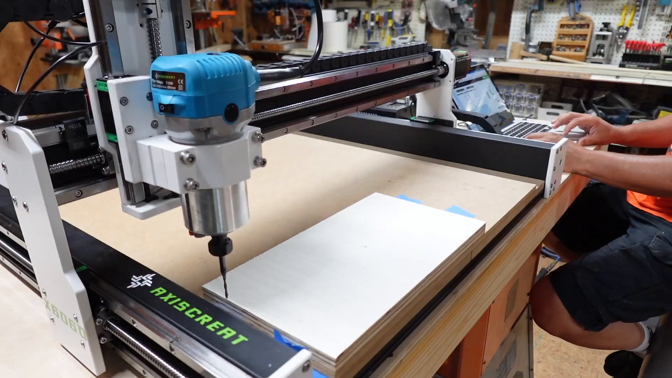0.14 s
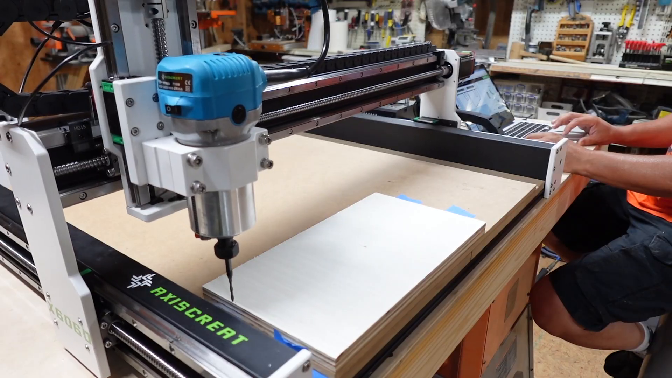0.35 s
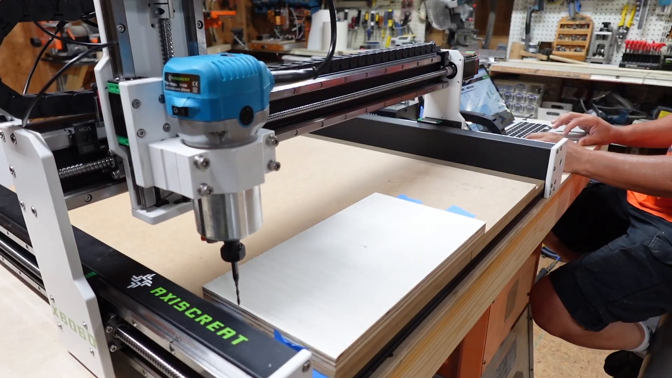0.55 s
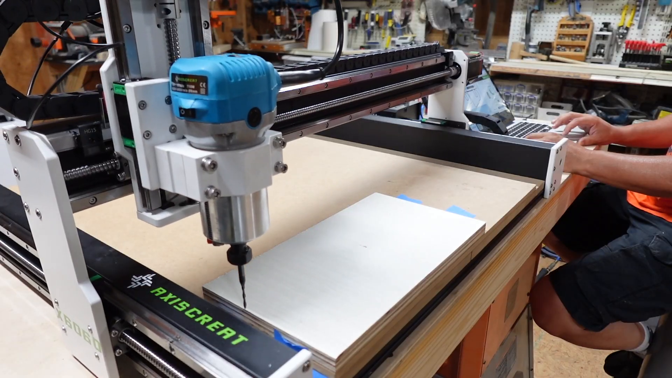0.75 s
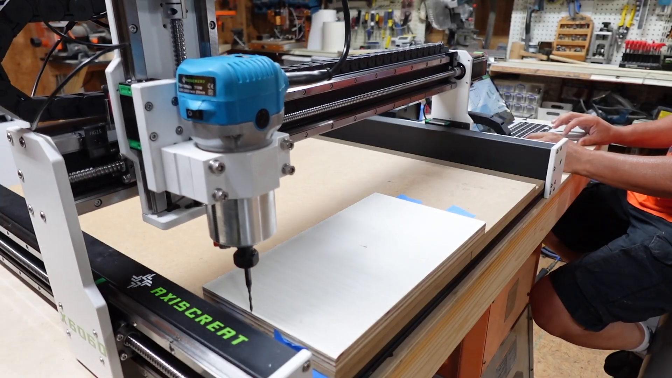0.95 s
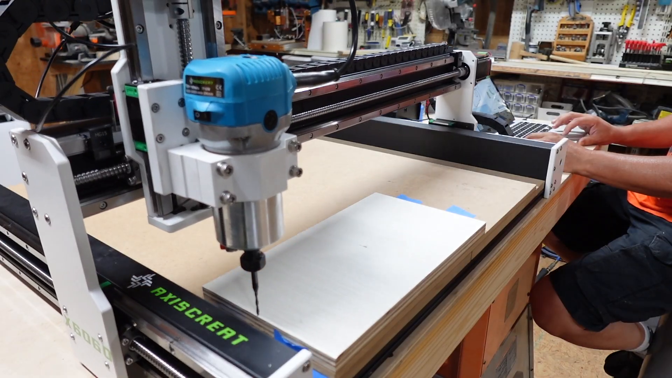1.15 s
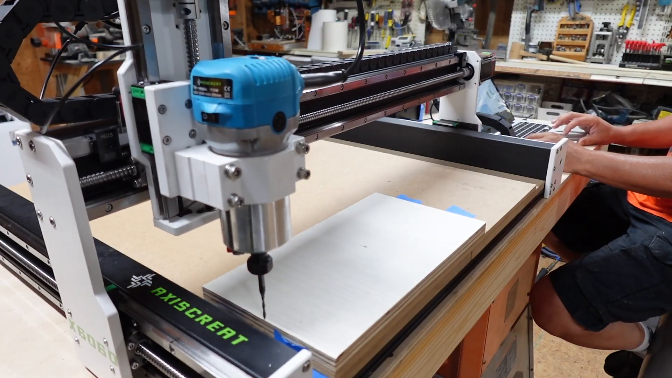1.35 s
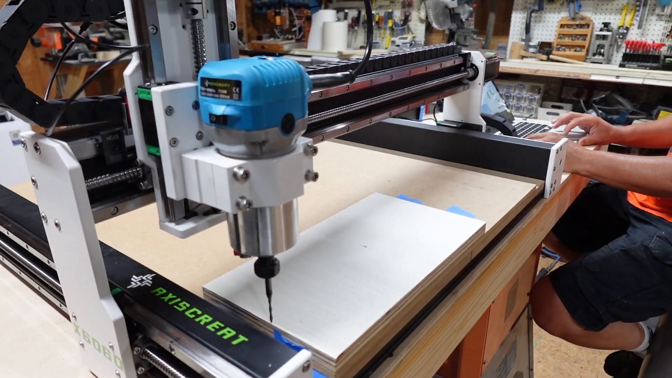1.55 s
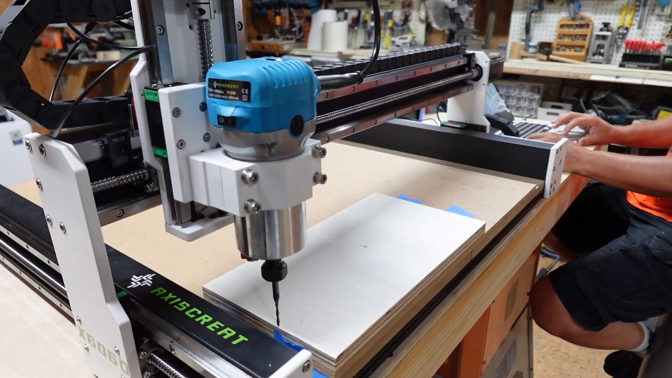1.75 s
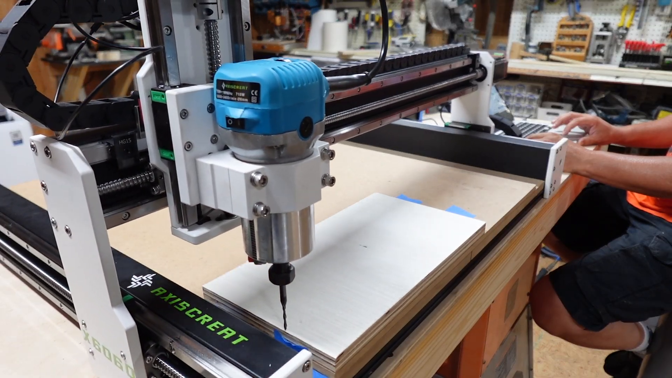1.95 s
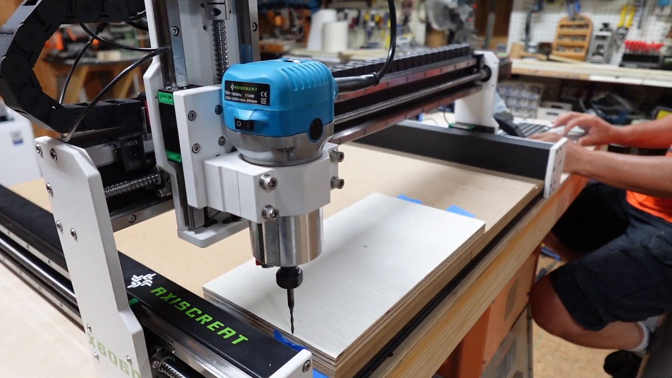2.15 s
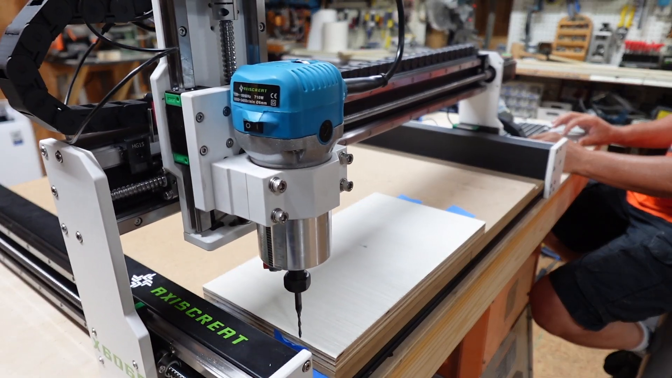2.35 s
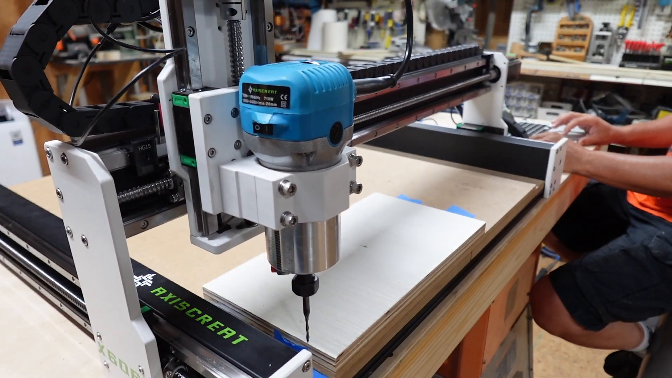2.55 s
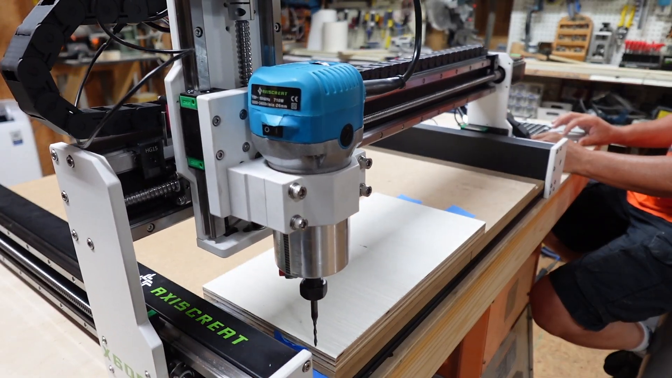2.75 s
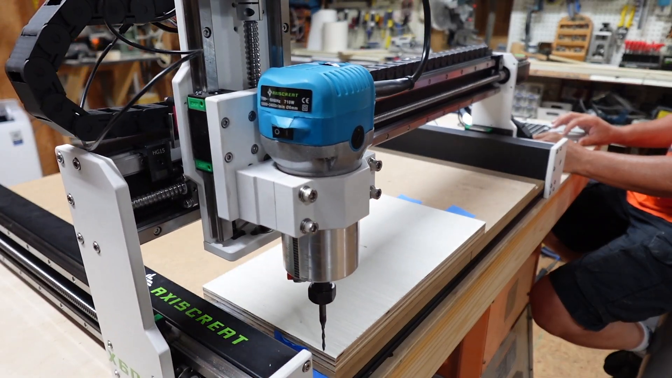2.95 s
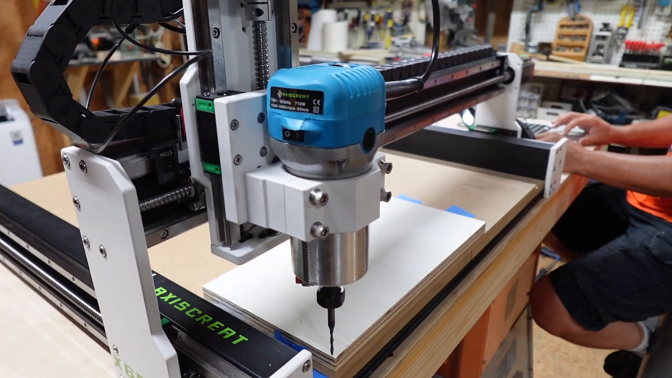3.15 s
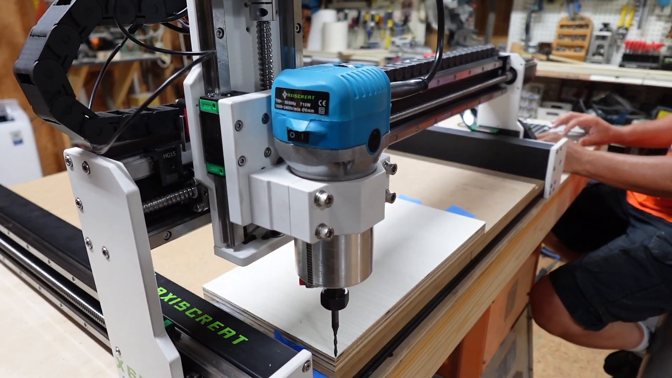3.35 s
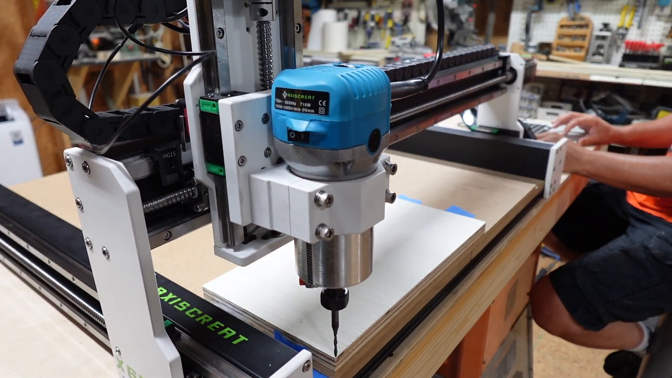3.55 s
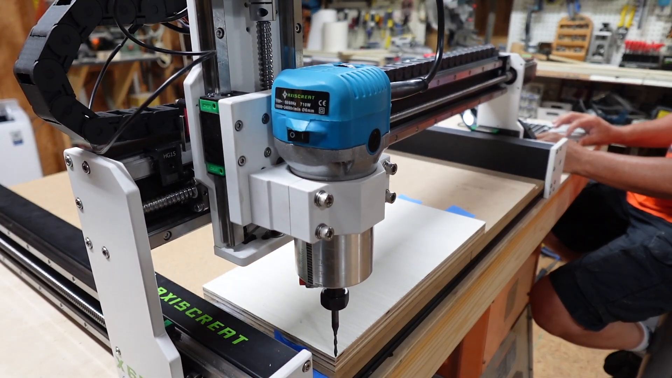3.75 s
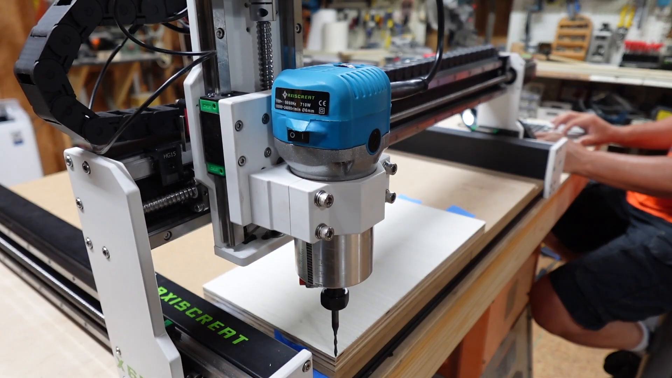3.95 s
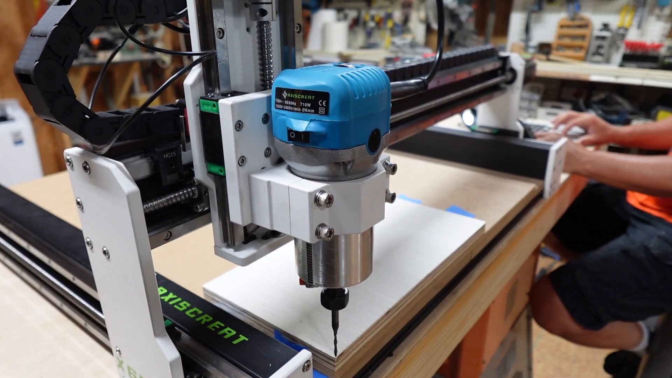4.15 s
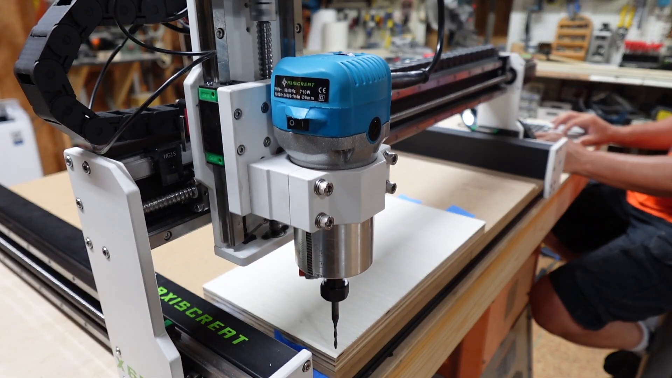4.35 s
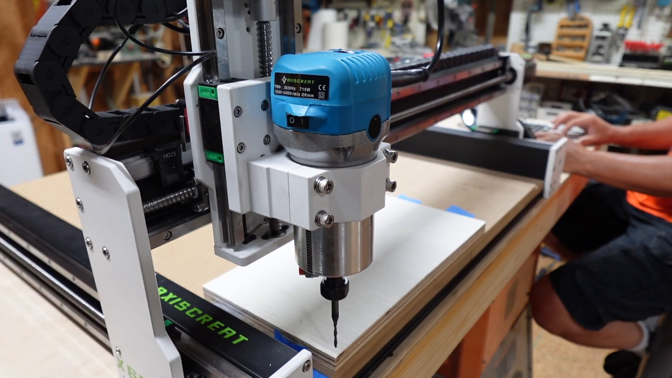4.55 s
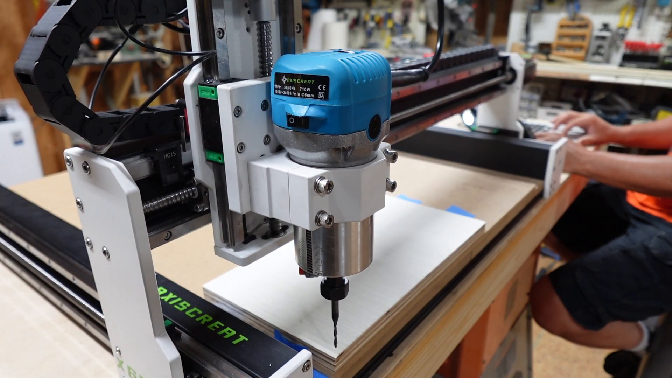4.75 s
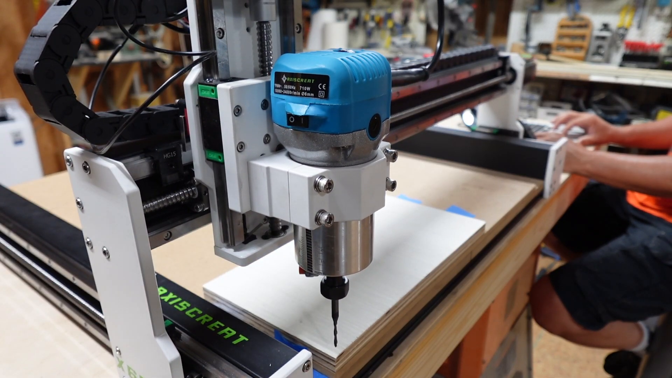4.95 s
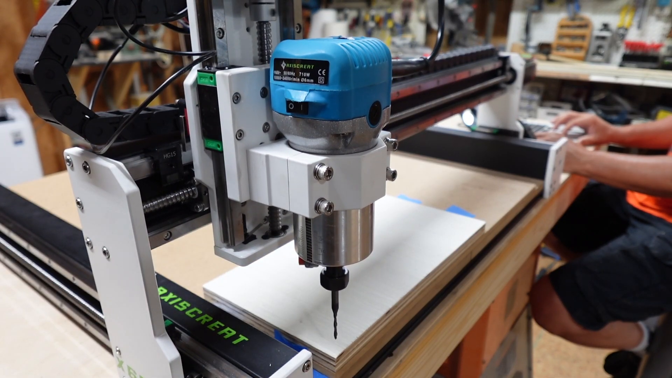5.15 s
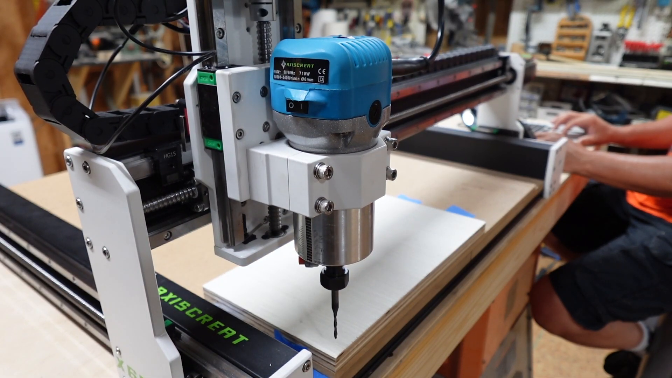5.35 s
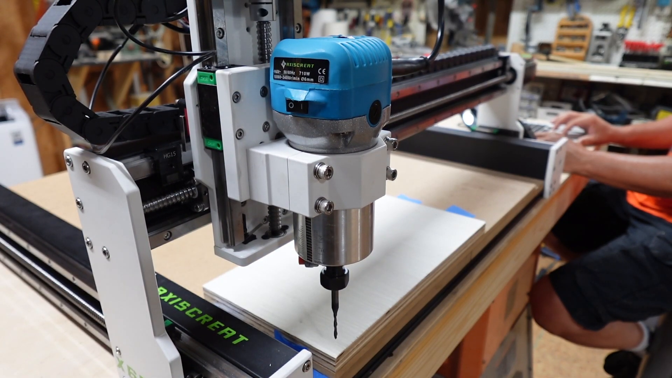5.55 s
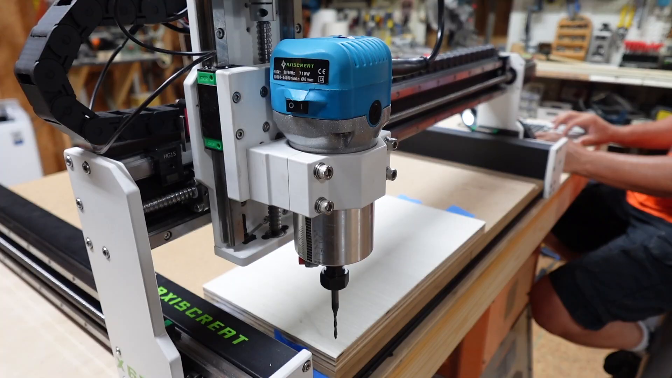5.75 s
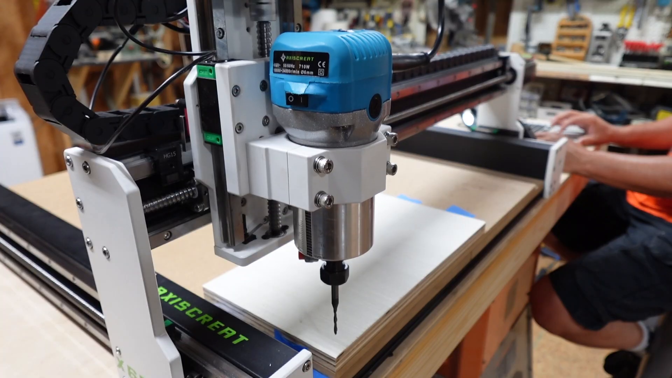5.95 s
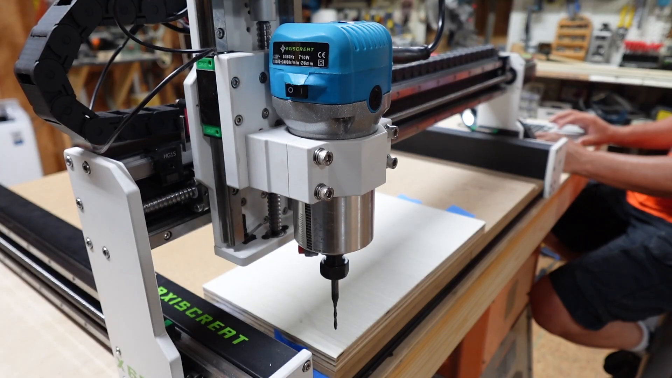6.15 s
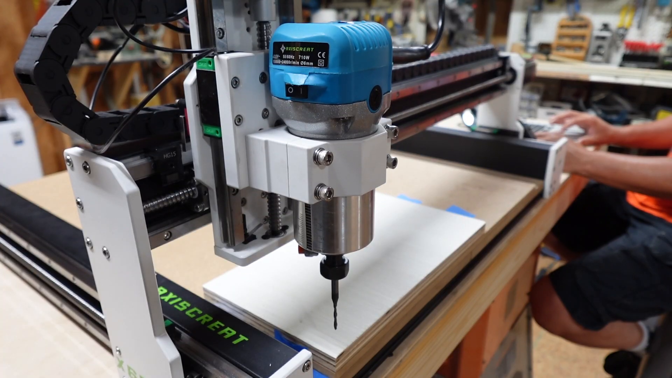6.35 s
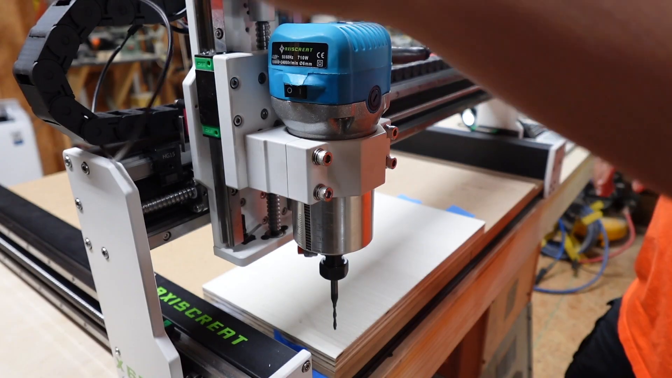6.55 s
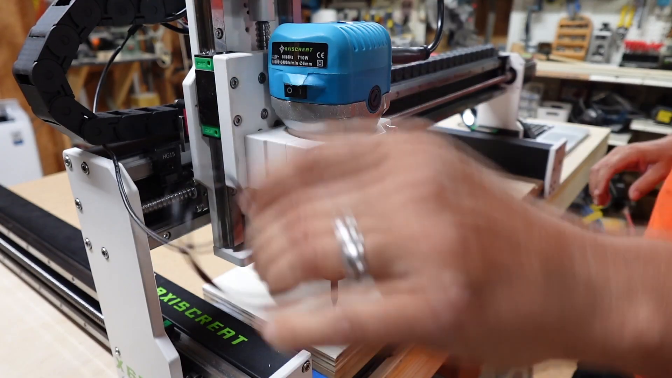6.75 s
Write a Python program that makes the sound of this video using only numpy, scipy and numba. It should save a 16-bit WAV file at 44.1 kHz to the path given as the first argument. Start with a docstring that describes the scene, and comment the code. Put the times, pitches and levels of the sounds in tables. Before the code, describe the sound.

A stepper motor drones and whines with rolling hiss for three seconds, brakes abruptly, then three faint clicks each precede a tiny motor blip.

```python
"""A stepper motor drives the carriage of a desktop CNC router along its gantry in a workshop, then brakes.
Its hum and whine are sines locked to the shaft angle; filtered noise makes the nut roll along a ringing screw.
Three small clicks at a laptop, filtered impulses, each precede a short, quiet move of the vertical axis.
A faint resonant noise floor rises and drops in spells over steady background noise; noise tails make the room."""
import sys
import numpy as np
from scipy import signal
from scipy.fft import rfft, irfft
from scipy.io import wavfile
from scipy.ndimage import uniform_filter1d, map_coordinates
from numba import njit

SR = 44100
rng = np.random.default_rng(int(sys.argv[2]) if len(sys.argv) > 2 else 0)


def wav_record(signal):
    """Record a signal, one row per channel, as 16-bit PCM in the file named by sys.argv[1]."""
    frames = np.transpose(np.atleast_2d(signal))
    bounded = np.clip(frames, -1, 1)
    # unit amplitude maps onto the largest positive 16-bit level
    quanta = np.round(bounded * 32767).astype(np.int16)
    wavfile.write(sys.argv[1], SR, quanta)


N = 304290
T = np.arange(N) / SR  # seconds
SHAFT_HZ, RAMP_S = 12.168, .094  # turns per second at full speed; time from rest to full speed

# The long move of the carriage, under way from the outset.
# Each row: full speed reached in seconds, braking starts in seconds, relative level in dB.
GANTRY_MOVE = [(-1, 3.299, 0.5)]


def undb(db):
    """Logarithmic level: decibels become an amplitude ratio."""
    return 10 ** (np.asarray(db) / 20)


def unit(x):
    """Normalisation by power: scale to rms 1."""
    return x / np.sqrt(np.mean(x ** 2))


def walk(rate):
    """Band-limited chance: random values, rate per second, smoothed twice, with a spread near 1."""
    k = int(SR / rate)
    values = np.repeat(rng.standard_normal(N // k + 1), k)
    return 1.7 * uniform_filter1d(uniform_filter1d(values, k), k)[:N]


def curve(points):
    """Linear interpolation: timed points joined by straight lines."""
    return np.interp(T, *np.transpose(points))


def ease(at_s, over_s):
    """Sigmoid transition: a smooth change from 0 to 1, halfway at at_s."""
    return .5 + .5 * np.tanh((T - at_s) / over_s)


def colour(x, points):
    """Minimum-phase filtering: a causal filter whose spectrum follows (Hz, dB) points."""
    hz, db = np.transpose(points)
    size = 4096
    log_hz = np.log(np.fft.rfftfreq(size, 1 / SR) + 1)
    gain = undb(np.interp(log_hz, np.log(hz), db))
    # folding the cepstrum onto positive times makes the response causal
    cepstrum = irfft(np.log(gain))
    cepstrum[1:size // 2] *= 2
    cepstrum[size // 2 + 1:] = 0
    response = irfft(np.exp(rfft(cepstrum)))
    return signal.fftconvolve(x, response)[:len(x)]


@njit
def svf(x, hz, width):
    """Second-order resonance: a state-variable band-pass with a moving centre, gain 1 there."""
    y, band, low = np.empty(len(x)), 0., 0.
    for i in range(len(x)):
        g, k = np.pi * hz[i] / SR, width / hz[i]
        v = (band + g * (x[i] - low)) / (1 + g * (g + k))
        band, low, y[i] = 2 * v - band, low + 2 * g * v, k * v
    return y


def ring(x, modes):
    """Modal superposition: one drive excites fixed resonances (Hz, width in Hz, dB) in parallel."""
    return sum(undb(db) * svf(x, np.full(N, float(hz)), float(width)) for hz, width, db in modes)


def motion(moves, jitter, swell_db=0):
    """Kinematics: speed 0-1 on straight ramps, a gain swelling in each move, and the integrated shaft angle."""
    speed, gain = 0, 1
    for start, stop, db in moves:
        ramp = np.clip(1 + np.minimum(T - start, stop - T) / RAMP_S, 0, 1)
        progress = np.clip((T - start) / (stop - start), 0, 1)
        speed = speed + ramp
        gain = gain * undb((db + swell_db * (progress - 1.0)) * (ramp > 0))
    steps_per_turn = 200
    # jitter is in radians of the step tone's phase
    shake = jitter * walk(170) / steps_per_turn
    return speed, gain, 2 * np.pi * SHAFT_HZ * np.cumsum(speed) / SR + shake


def tones(angle, orders, waver_db):
    """Order excitation: sines locked to multiples of the shaft angle, each wavering as the load shifts."""
    out = 0
    for multiple, db in orders:
        level = undb(db + waver_db * walk(4.2))
        out = out + level * np.sqrt(2) * np.sin(multiple * angle + rng.uniform(0, 2 * np.pi))
    return out


def rolling(grain_db):
    """Contact noise: white noise with random grain, as from dense, uneven contacts of balls in nut and rails."""
    return unit(rng.standard_normal(N) * undb(grain_db * walk(450)))


def soften(x, speed, corner_hz=2600):
    """Contact stiffness: slow contacts are softer, so the treble follows the speed."""
    dull = signal.sosfilt(signal.butter(1, corner_hz, fs=SR, output="sos"), x)
    return dull + speed * (x - dull)


def settle(drive, settle_s):
    """Exponential relaxation: loose parts go on rattling briefly after their drive has eased."""
    keep = np.exp(-1 / (settle_s * SR))
    return np.maximum(drive, signal.lfilter([1 - keep], [1, -keep], drive))


def chatter(angle, chop_hz=95, depth=0.46):
    """Amplitude modulation: the whine is chopped rapidly, near 95 times a second, in a wandering rhythm."""
    chop_phase = 2 * np.pi * chop_hz * T + 1.2 * walk(60)
    return np.sqrt(2) * np.sin(200 * angle) * (1 + depth * np.cos(chop_phase))


def driver(moving, db):
    """Current chopping: the motor supply whistles thinly near 13.4 kHz while an axis moves."""
    return undb(db) * np.sqrt(2) * moving * np.sin(2 * np.pi * 13400 * T + .9 * walk(40))


def gantry():
    """Forced vibration by a moving axis: the tones of the long move, and its rattle."""
    speed, gain, angle = motion(GANTRY_MOVE, jitter=0.16)
    whistle = driver(np.minimum(10 * speed, 1), db=-71)
    return gain * gantry_motor(speed, angle) + whistle, gain * gantry_rattle(speed)


def gantry_motor(speed, angle, swing=0.4, tight_spot=1.4, hum_db=2.12, whine_db=1.23, braking_db=-17):
    """Synchronous excitation: coil hum and step whine; under braking the whine sweeps through frame modes."""
    # Coil hum along the gantry. Each row: time in seconds, level in dB before hum_db is added.
    hum_levels = [(0.04, -28), (0.26, -29.5), (0.55, -35), (0.67, -31), (1.15, -26), (1.18, -30),
                  (2.28, -32), (2.87, -28.5), (3.26, -29)]
    # Step whine, swelling late in the travel. Each row: time in seconds, level in dB before whine_db is added.
    whine_levels = [(0.1, -35), (1.62, -29), (2.13, -35), (2.47, -26), (3.07, -20.5), (3.28, -20.5)]
    # Weaker motor tones. Each row: multiple of the shaft speed, relative level in dB.
    orders = [(71, -50), (95, -52.5), (100, -38), (101, -52), (103, -47), (150, -45), (151, -42),
              (194, -47.5), (250, -65), (300, -74.5), (400, -66), (550, -77), (600, -72)]
    # Frame modes. Each row: frequency in Hz, width in Hz, relative gain in dB.
    frame_modes = [(883, 38, 0.5), (960, 52.8, -6.5), (1400, 120, -5.5), (1850, 330, -3), (2350, 64, 3),
                   (478, 62, -17), (236, 26, -12)]
    # fifty rotor teeth, four full steps to each; the rotor labours at a tight spot (radians) in each turn
    turn = angle - tight_spot
    coil = np.sqrt(2) * np.sin(50 * angle)
    step = np.sqrt(2) * np.sin(200 * angle + swing * np.sin(turn))
    hum = undb(curve(hum_levels) + hum_db) * coil
    whine = undb(curve(whine_levels) + whine_db) * step * throb(turn)
    running = (hum + whine + tones(angle, orders, waver_db=1.1)) * speed ** 6
    # strongest at half speed, absent at rest and at full speed
    braking = np.sqrt(4 * speed * (1 - speed))
    return running + ring(undb(braking_db) * braking * chatter(angle), frame_modes)


def throb(turn):
    """Periodic modulation at constant power: ever deeper once a turn, then twice a turn and calming."""
    change_s = 0.092
    flipped = ease(1.46, change_s)
    calmed = ease(2.25, change_s)
    once = (0.32 + 0.25 * T) * (1 - flipped)  # modulation depths
    twice = (0.072 + 0.28 * (1 - calmed)) * flipped
    gain = 1 + once * np.cos(turn) - twice * np.cos(2 * turn)
    return gain / np.sqrt(1 + (once ** 2 + twice ** 2) / 2)


def gantry_rattle(speed, body_db=18.0):
    """Structure-borne noise: the rolling nut hisses, rings the screw and shakes the carriage plates."""
    # Hiss of the nut. Each row: time in seconds, level in dB before body_db is added.
    hiss_levels = [(0.08, -49), (1.41, -49.5), (1.95, -51), (2.91, -49), (3.24, -49.5)]
    # Spectrum of the rolling noise. Each row: frequency in Hz, relative level in dB per Hz.
    body_spectrum = [(30, -23.5), (110, -4), (190, -7.5), (450, 0), (680, -2.5), (900, -3), (1300, -1.5),
                     (1650, -8.5), (2400, -13), (2900, -22.5), (5000, -23), (5900, -34.5), (9000, -31),
                     (15500, -59)]
    # Plate resonances. Each row: frequency in Hz, width in Hz, relative level in dB, loudest at in seconds.
    plate_modes = [(448.5, 21, -40.5, .3), (488, 69, -36.5, .3), (730, 40, -39, 1.8), (860, 31, -37, 1.7),
                   (1335, 12, -44, 1.7), (1435, 24, -44, .3)]
    contacts = soften(bench_echo(rolling(grain_db=1.5)), np.sqrt(speed))
    body = undb(curve(hiss_levels) + body_db) * unit(colour(contacts, body_spectrum))
    plates = 0
    for hz, width, db, loudest_s in plate_modes:
        plate = unit(ring(rolling(grain_db=0.0), [(hz, width, 0)]))
        plates = plates + undb(db) * passing(loudest_s, fade_db_per_s=3.0) * plate
    return (body + plates) * settle(speed ** .8, settle_s=.02) + screw() * speed


def bench_echo(x, first_s=0.00043, last_s=0.00073, share=0.06):
    """Comb interference: a bed reflection whose path grows as the listener edges round recolours the hiss."""
    braking_starts_s = GANTRY_MOVE[0][1]
    lag = np.interp(T, [0, braking_starts_s], [first_s, last_s])
    return x + share * map_coordinates(x, [(T - lag) * SR], order=3)


def screw():
    """Length-dependent resonance: the screw rings on both sides of the nut, at pitches that follow the spans."""
    # Screw resonances, falling on the growing span and rising on the shrinking one.
    # Each row: first frequency in Hz, last frequency in Hz, halfway at in seconds, width of each of two
    # filters in Hz, loudest at in seconds, relative level there in dB, fade to either side in dB per second.
    span_modes = [(117, 72, 1.1, 8, 3.1, -41.5, 5.5), (317, 238, .72, 14, 1.9, -38.5, 0.8),
                  (952, 1200, 1.75, 90, 1.5, -35.5, 2)]
    out = 0
    for first_hz, last_hz, halfway_s, width, loudest_s, db, fade in span_modes:
        hz = first_hz + (last_hz - first_hz) * ease(halfway_s, .75)
        span = svf(svf(rolling(grain_db=1.8), hz, float(width)), hz, float(width))
        out = out + undb(db) * passing(loudest_s, fade) * steady(span)
    return out


def passing(loudest_s, fade_db_per_s):
    """Position-dependent coupling: gain as the nut nears and leaves the place where it drives a mode best."""
    return undb(-fade_db_per_s * np.abs(T - loudest_s))


def steady(x, over_s=.15):
    """Running power normalisation: even out the slow swells of a narrow resonance driven without pause."""
    power = np.abs(uniform_filter1d(x ** 2, int(over_s * SR)))
    return x / np.sqrt(power + 1e-18)


def background():
    """Gated and stationary noise: a faint resonant floor rises and drops in spells over steady shop noise."""
    # Spells in which the faint noise floor is raised.
    # Each row: start in seconds, end in seconds, level in dB whose gain is added to the rest gain.
    floor_spells = [(3.2, 3.648, -60), (4.02, 4.226, -60.5), (4.542, 6.499, -68.5)]
    # Resonances of the noise floor. Each row: frequency in Hz, width in Hz, relative gain in dB.
    floor_modes = [(247, 28, 4.5), (446, 190, 1), (960, 220, -9), (1300, 67, -4), (1560, 150, -18),
                   (2550, 300, -22.5)]
    # Spectrum of the steady shop noise. Each row: frequency in Hz, relative level in dB per Hz.
    shop_spectrum = [(15, -37.5), (25, -9), (44, 2.5), (71, -8.5), (129, -3.5), (188, -8), (410, -22),
                     (3430, -29.5), (4370, -30.5), (5280, -30), (15500, -34)]
    rest_db, fade_s = -71.5, 0.042
    gain = undb(rest_db)
    for start, end, db in floor_spells:
        gain = gain + undb(db) * (ease(start, fade_s) - ease(end, fade_s))
    noise_floor = gain * unit(ring(unit(rng.standard_normal(N) * undb(1.5 * walk(450))), floor_modes))
    shop = undb(-64) * unit(colour(rng.standard_normal(N), shop_spectrum))
    return noise_floor + shop


def clicks(bounce_s=0.001225, loss_db=-0.5, count=3):
    """Impulse excitation: each click is a snap and the switch bouncing on its stop."""
    # Clicks at the laptop. Each row: time in seconds, peak level of the first contact alone in dB.
    click_times = [(4.0717, -40), (4.8053, -39), (5.6597, -38.5)]
    # Spectrum of one contact. Each row: frequency in Hz, relative level in dB.
    click_spectrum = [(150, -10), (500, -4), (900, 3), (1500, -6), (2200, -2), (3600, -13), (5000, -24),
                      (8000, -28), (15000, -41)]
    out = np.zeros(N)
    for start, db in click_times:
        for k in range(count):
            contact_s = start + k * bounce_s * rng.uniform(.8, 1.2)
            out[int(contact_s * SR)] += (-1) ** k * undb(db + k * loss_db)
    peak = np.abs(colour(signal.unit_impulse(N), click_spectrum)).max()
    return colour(out, click_spectrum) / peak


def lift(step_db=-43.5):
    """Forced vibration under load: tones of three short vertical moves, and rattle that grows under braking."""
    # Moves. Each row: full speed reached in seconds, braking starts in seconds, relative level by then in dB.
    lift_moves = [(4.321, 4.444, -0.18), (5.088, 5.212, -1.3), (6.003, 6.127, 0.58)]
    # Weaker motor tones. Each row: multiple of the shaft speed, relative level in dB.
    orders = [(50, -59), (100, -66), (150, -58), (151, -61), (201, -57), (400, -80)]
    # Modes of the vertical slide. Each row: frequency in Hz, width in Hz, relative gain in dB.
    slide_modes = [(440, 82, -0.5), (850, 64, 6), (1370, 180, 3.5), (1753, 120, -0.5), (2350, 180, 5.5)]
    # Spectrum of the rolling noise. Each row: frequency in Hz, relative level in dB per Hz.
    body_spectrum = [(30, -11), (130, -9), (240, 1), (330, -5), (550, -1), (750, -12.5), (1350, -4),
                     (1650, -16), (2500, -13.5), (3000, -21.5), (5000, -26), (6200, -31.5), (9000, -36.5),
                     (15500, -41)]
    speed, gain, angle = motion(lift_moves, jitter=0.15, swell_db=4.5)
    braking = uniform_filter1d(1. * (np.gradient(speed) < 0), size=700)
    step = np.sqrt(2) * np.sin(200 * angle) * undb(1.6 * walk(130))
    others = tones(angle, orders, waver_db=1)
    motor = (undb(step_db) * step + others) * speed ** 9
    # the slide answers the sweeping whine weakly as the speed rises, strongly as it falls
    sweep_gain = speed ** 1.51 * np.sqrt(1 - speed) * undb(-46.5 + 11.0 * braking)
    sweep = ring(chatter(angle) * sweep_gain, slide_modes)
    # the screw takes up its load gently and rattles on until it stops
    load = (1 - braking) * speed ** 1.4 + braking * undb(2.5) * speed ** .8
    contacts = unit(colour(soften(rolling(grain_db=1.5), speed), body_spectrum))
    rattle = contacts * settle(load, settle_s=0.016) * undb(-46.5)
    whistle = driver(np.maximum(speed ** 7, braking * np.sqrt(speed)), db=-83)
    return gain * (motor + sweep) + whistle, gain * rattle


def room(x, t60, wet_db, treble_share=.85, split_hz=5000, lowest_hz=200):
    """Diffuse reverberation: a cluttered workshop, too small to ring in the bass; the treble dies sooner."""
    t = T[:SR]
    high_pass = signal.butter(2, lowest_hz, "high", fs=SR, output="sos")
    noise = signal.sosfilt(high_pass, rng.standard_normal(SR))
    low = signal.sosfilt(signal.butter(1, split_hz, fs=SR, output="sos"), noise)
    fade = np.exp(-np.log(1000) * t / t60)  # 60 dB down after t60 seconds
    tail = (low * fade + (noise - low) * fade ** (1 / treble_share)) * (t > .005)
    return undb(wet_db) * signal.fftconvolve(x, tail / np.linalg.norm(tail))[:N]


def scene():
    """Direct and diffuse fields: motors are close; screws and rails radiate along their length into the room."""
    long_tones, long_rattle = gantry()
    short_tones, short_rattle = lift()
    ticks = clicks()
    direct = long_tones + long_rattle + short_tones + short_rattle + ticks
    send = undb(-11.5) * (long_tones + short_tones) + long_rattle + undb(4) * short_rattle + undb(-2) * ticks
    # the bench and the machine bed give the short tail, the shelves and walls the long one
    near = room(send, t60=0.18, wet_db=-7.5)
    far = room(send, t60=0.54, wet_db=-20.0)
    return (direct + near + far + background())[None]


def record(dry):
    """Band limitation: a steep elliptic low-pass cuts the top of the spectrum."""
    top_hz = 15700
    return signal.sosfilt(signal.ellip(10, .1, 80, top_hz, fs=SR, output="sos"), dry)


dry = scene()
out = record(dry)
wav_record(out)
```